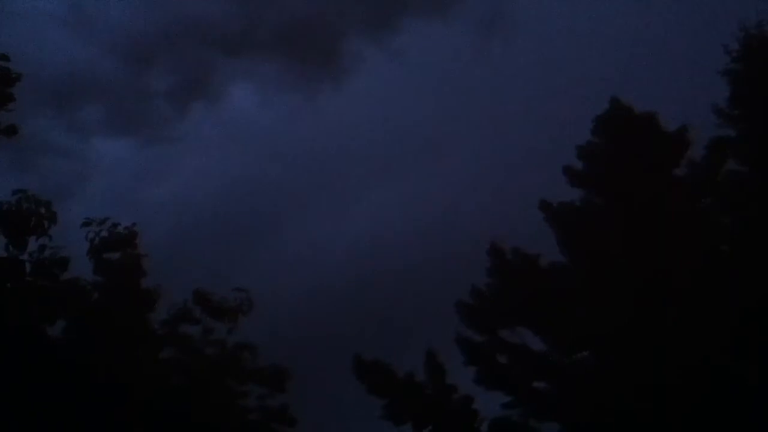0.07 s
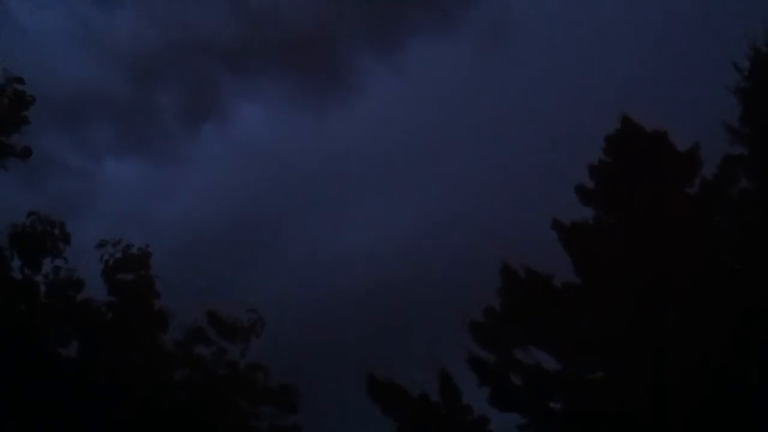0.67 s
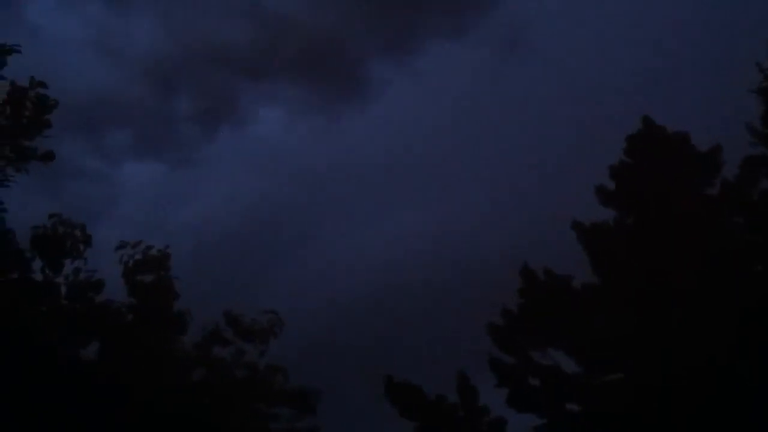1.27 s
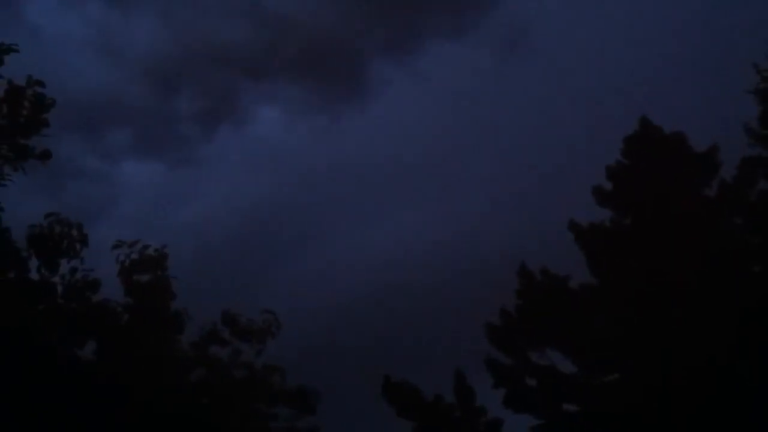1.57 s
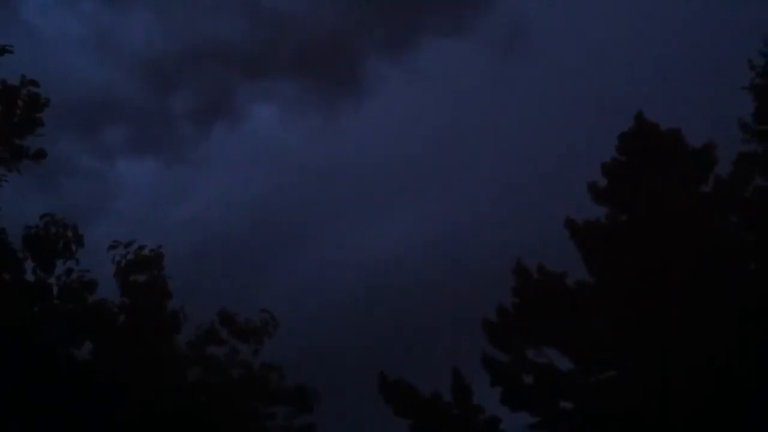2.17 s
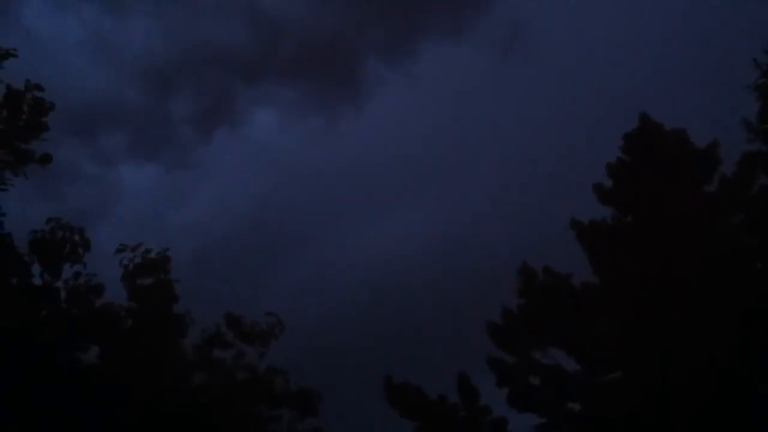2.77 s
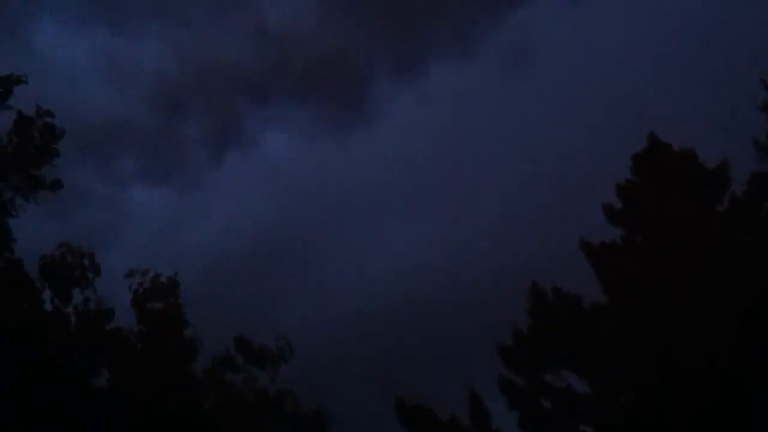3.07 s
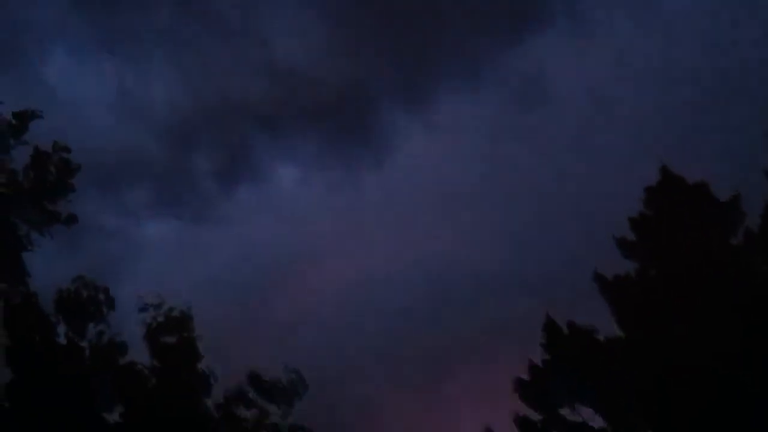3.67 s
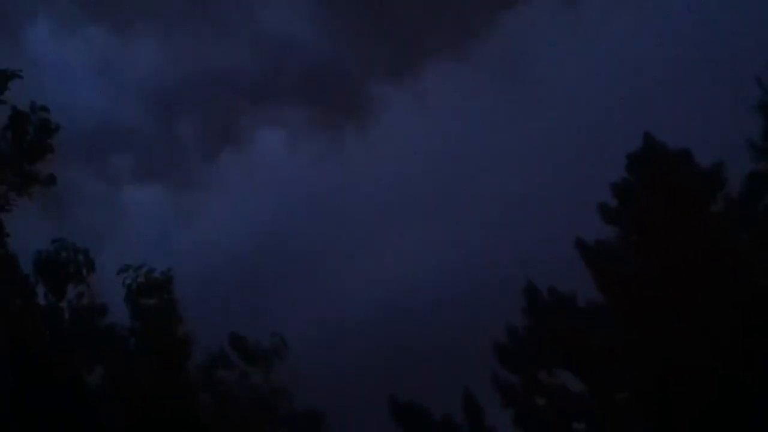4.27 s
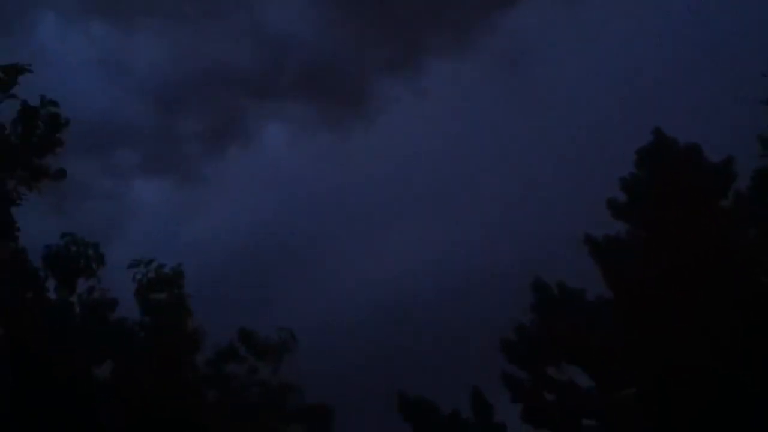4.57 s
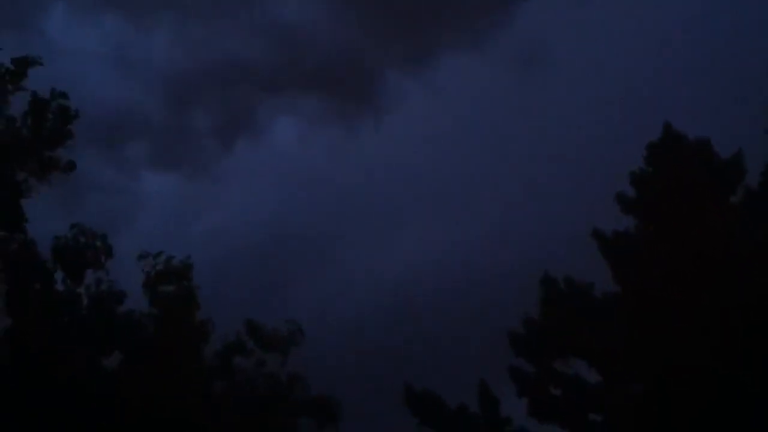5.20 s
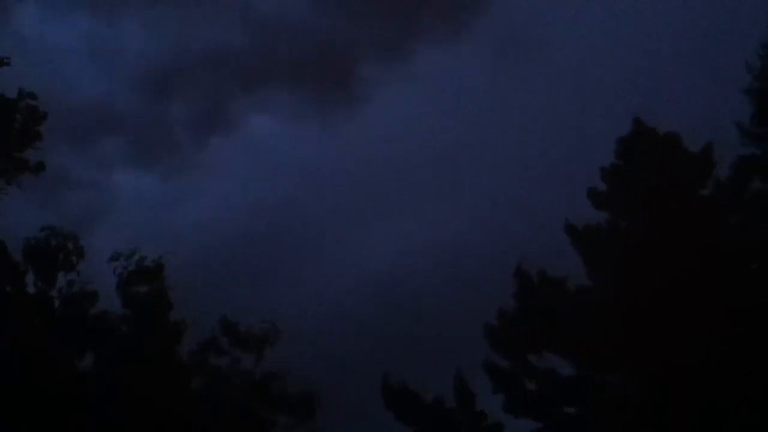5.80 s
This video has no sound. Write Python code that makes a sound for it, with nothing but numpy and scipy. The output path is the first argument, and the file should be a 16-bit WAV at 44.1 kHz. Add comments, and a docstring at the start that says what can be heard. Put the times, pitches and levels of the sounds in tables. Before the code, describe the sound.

Far thunder rolls over a garden, already rumbling at the start. It swells in a chain of low, rounded peals, is loudest about two seconds in, then mutters away with one smaller late swell. A soft breeze rises in the trees as it fades, and a distant motor hums very faintly. The small handheld microphone adds steady hiss and a few tiny clicks, and something gives one light tap.

```python
"""Far thunder rolls over a garden at dusk: a chain of peals swells three times, then mutters away.
Shocks from the kinks of the lightning channel arrive rounded by air and coloured by nearby walls.
Wind rises softly in the trees, a distant motor hums, and something gives one light tap.
A small camera adds microphone hiss and faint ticks, knocks and finger brushes in the hand."""
import sys
import numpy as np
from scipy import signal
from scipy.fft import rfft, irfft, next_fast_len
from scipy.io import wavfile
from scipy.ndimage import uniform_filter1d

SR = 44100
rng = np.random.default_rng(int(sys.argv[2]) if len(sys.argv) > 2 else 0)


def wrap_up_sound(samples):
    """Save the sound to the file named by the first command line argument, as 16-bit audio."""
    columns = np.atleast_2d(samples).T
    # keep every value between -1 and 1, then stretch to whole-number steps
    tamed = np.clip(columns, -1, 1)
    steps = np.round(tamed * 32767).astype(np.int16)
    wavfile.write(sys.argv[1], SR, steps)


N = 266364
TIME_S = np.arange(N) / SR
CUTOFF_HZ = 15700
ECHO_DB, ECHO_T60_S = -2.5, 0.74  # off land and clouds
FLUTTER_DB, FLUTTER_HZ = 1.1, 9.2  # uneven roll of the rumble
RUMBLE_BODY_DB, PEAL_GRAVEL_DB = -3.5, -7.5  # rumble's body re its roll; peals' gravel re their body

# Spectra of microphone hiss, far foliage and near leaves: freq_hz, relative_db
HISS_SPECTRUM = [(20, -5), (200, 2), (1000, 4), (2500, 1.5), (4000, 0.64), (5000, -2), (6300, -4),
                 (8000, -7), (10000, -12), (12500, -15), (14500, -17), (16000, -22)]
WASH_SPECTRUM = [(45, -32), (70, -9.5), (110, -5.5), (200, 5.5), (400, 1), (620, 2.5), (760, 8.5),
                 (900, 2.5), (1200, 0.5), (1500, -5), (1900, -8.5), (2500, -19), (4000, -34), (8000, -40)]
LEAF_SPECTRUM = [(800, -23), (1300, 4.5), (1600, 3), (2050, 3), (2500, -7), (4000, -20), (8000, -46)]
# Far foliage and near leaves as one gust arrives: time_s, level_db
WASH_CURVE = [(0, -69), (1.4, -71), (2.8, -73), (3.25, -69.5), (6.04, -69.5)]
LEAF_CURVE = [(0, -99), (2.8, -86.5), (3.9, -78.5), (4.5, -86), (4.66, -76.5), (4.9, -79), (5.25, -78),
              (5.58, -74.5), (5.8, -75.5), (6.04, -78)]
# Motor tones: pitch_hz, level_db
MOTOR_PARTIALS = [(582, -87), (757, -79.5), (873, -88.5), (932, -85.5), (1107, -89.5), (1217, -91)]
# Fingers on the camera case: centre_s, level_db, centre_hz, half_length_s
FINGER_BRUSHES = [(2.612, -81, 8500, .012), (2.646, -76, 7000, .015)]
# Camera knocks: start_s, level_db, pitch_hz, t60_s
CASE_KNOCKS = [(2.6059, -60, 12500, .0025), (3.6964, -53.5, 925, .012), (3.7015, -58, 760, .012)]
# Tap and its one bounce: start_s, strength_db
TAP_HITS = [(2.052, -0.5), (2.0568, -10)]
# Modes of the tapped object: pitch_hz, level_db, t60_s
TAP_RINGS = [(1130, -55, 0.018), (1460, -66, 0.065), (1860, -60.5, 0.055), (2044, -60, 0.05),
             (2360, -69, 0.03)]

# Resonances between walls: centre_hz, width_hz, lift_db
WALL_MODES = [(139, 8.8, 4), (171.5, 11, 5), (226.7, 13, 5), (291.5, 13, 3.5), (341.7, 16, 4.5),
              (386, 18, 2.8)]
# Thunder bands, low to high: freq_hz, relative_db
DEEP_SPECTRUM = [(20, -25), (42, -39), (58, -15), (78, -15.5), (98, 2), (112, 6), (135, -12), (200, -38)]
ROLL_SPECTRUM = [(50, -61), (85, -46), (108, -28.5), (135, -2), (170, 3), (235, 0), (280, -20),
                 (400, -33.5)]
BODY_SPECTRUM = [(170, -46), (230, -19.5), (265, 6), (375, 3), (425, -11), (490, -20), (650, -41)]
GRAVEL_SPECTRUM = [(300, -39.5), (390, -8.5), (440, 1.5), (530, 0), (640, -4.5), (790, -11), (950, -20),
                   (1300, -46), (2200, -56)]
# Deep bass, bending round the land in smooth swells: time_s, level_db
DEEP_CURVE = [(0, -80), (0.12, -62), (0.5, -78), (0.95, -64), (1.35, -73.5), (1.75, -63), (2.1, -62),
              (2.35, -63.5), (2.48, -72), (2.66, -69), (2.84, -65), (3.05, -80), (3.5, -75.5), (4.65, -78),
              (4.9, -67.5), (5.25, -84.5), (6.04, -78)]
# Unbroken rumble of countless small arrivals: time_s, level_db
RUMBLE_CURVE = [(0, -50), (1.05, -55), (1.38, -59.5), (1.8, -53), (2.3, -53.5), (3.05, -58.5), (3.75, -63),
                (5.0, -62.5), (5.25, -63.5), (6.04, -64.5)]
# Air absorption, greater on the longer, later paths: time_s, gravel_gain_db
AIR_CURVE = [(0, 0.5), (1.95, -2), (2.5, -6), (6.04, -4)]
# Thumps standing out of the roll: centre_s, level_db, centre_hz, half_length_s
THUMPS = [(0.071, -49.5, 188, 0.011), (0.11, -45.5, 183, 0.01), (0.103, -60, 510, 0.01),
          (0.213, -46.5, 180, 0.012), (0.5, -46, 209, 0.014), (0.53, -51, 200, 0.0105),
          (0.63, -57, 181, 0.0075), (0.847, -47, 215, 0.012), (0.912, -50, 370, 0.019),
          (0.926, -48, 196, 0.0069), (1.007, -43, 180, 0.0054), (1.043, -52, 197, 0.0055),
          (1.082, -41.5, 185, 0.015), (1.697, -44, 187, 0.017), (1.701, -78, 66, .035),
          (1.723, -46, 203, 0.0066), (1.748, -40, 270, 0.0059), (1.749, -55, 570, 0.0073),
          (1.85, -36.5, 205, 0.0081), (1.857, -54.5, 536, 0.01), (1.876, -40, 192, 0.0084),
          (1.879, -54, 120, 0.021), (1.914, -53, 346, 0.0082), (1.955, -48, 360, .009),
          (1.982, -40, 230, 0.0068), (1.99, -54.5, 530, 0.0098), (2.008, -51, 118, .025),
          (2.011, -40, 222, 0.01), (2.07, -38.5, 188, 0.0052), (2.111, -40, 215, 0.0079),
          (2.118, -40, 173, 0.0094), (2.154, -41, 213, 0.0098), (2.245, -49, 185, 0.014),
          (2.531, -46, 315, 0.0081), (2.564, -50.5, 320, 0.017), (2.677, -75, 62, .03),
          (2.684, -47, 140, 0.018), (2.699, -42, 220, 0.022), (2.708, -48.5, 332, 0.013),
          (2.743, -48.5, 266, 0.016), (2.963, -57, 280, 0.0078), (4.816, -74.5, 66, .035),
          (4.825, -71, 104, 0.035), (4.847, -58.5, 324, .03), (5.76, -57.5, 227, 0.042)]
# Peals, one per lightning branch: crest_s, level_db, half_length_s, brightness_db
BRANCH_PEALS = [(0.115, -43, 0.1, -8), (0.24, -59, 0.029, 1), (0.525, -48.5, 0.06, -11),
                (0.644, -54.5, 0.14, 1.5), (0.842, -46, 0.06, -1.5), (0.912, -52, 0.028, 3),
                (1.051, -45.5, 0.047, -3), (1.27, -58, 0.057, -1), (1.474, -51.5, 0.046, -4),
                (1.55, -57, 0.022, 10.5), (1.678, -40.5, 0.053, -2), (1.75, -50.5, 0.078, 6.5),
                (1.801, -42.5, 0.025, -0.5), (1.866, -41, 0.028, -5.5), (1.95, -43, 0.045, -4),
                (2.087, -48, 0.13, -1), (2.345, -60.5, 0.15, 8), (2.693, -50, 0.11, -1),
                (2.823, -49.5, 0.08, -1), (3.137, -60.5, 0.012, 0), (3.488, -58, 0.041, -16),
                (4.037, -57.5, 0.056, -2.5), (4.719, -52.5, 0.022, -28), (4.835, -53, 0.081, -5),
                (4.95, -54, 0.04, -5), (5.862, -62, 0.064, -3)]


def from_db(db):
    """Decibels to gain."""
    return 10 ** (np.asarray(db) / 20)


def unit_rms(x):
    """Scale to rms 1."""
    return x / np.sqrt(np.mean(x ** 2) + 1e-20)


def per_sample(curve):
    """Interpolate a (time_s, value) curve."""
    return np.interp(TIME_S, *np.transpose(curve))


def coloured(x, spectrum):
    """Filter by a spectrum interpolated in log frequency; rms 1."""
    hz, db = np.transpose(spectrum)
    size = next_fast_len(N)
    bins_hz = np.maximum(np.fft.rfftfreq(size, 1 / SR), 1)
    gain = from_db(np.interp(np.log(bins_hz), np.log(hz), db, right=-120))
    return unit_rms(irfft(rfft(x, size) * gain, size)[:N])


def noise(spectrum):
    """Coloured Gaussian noise; rms 1."""
    return coloured(rng.standard_normal(N), spectrum)


def impulses(rate_hz, spread_db):
    """Random arrivals of either sign and uneven size."""
    arrives = rng.random(N) < rate_hz / SR
    return arrives * rng.choice([-1, 1], N) * from_db(spread_db * rng.standard_normal(N))


def levelled(x, span_s):
    """Flatten swells slower than the span; keep the grain."""
    size = int(span_s * SR)
    power = uniform_filter1d(uniform_filter1d(x ** 2, size), size)
    return x / np.sqrt(np.maximum(power, 1e-12))


def bandpass(x, hz, edge_ratio):
    """Gentle zero-phase band-pass."""
    sos = signal.butter(2, [hz / edge_ratio, hz * edge_ratio], "band", fs=SR, output="sos")
    return signal.sosfiltfilt(sos, x + 1e-18)


def bursts(source, table, edge_ratio):
    """Per row, one band of the source, evened and Gaussian-windowed."""
    out = np.zeros(N)
    for centre_s, db, hz, half_s in table:
        near = np.abs(TIME_S - centre_s) < 0.2
        ripples = signal.hilbert(unit_rms(bandpass(source[near], hz, edge_ratio)))
        even = np.sqrt(2) * ripples.real / np.hypot(np.abs(ripples), 0.3)
        window = np.exp(-((TIME_S[near] - centre_s) / half_s) ** 2)
        out[near] += from_db(db) * bandpass(window * even, hz, edge_ratio ** 2)
    return out


def hiss(level_db):
    """Steady microphone noise."""
    return from_db(level_db) * noise(HISS_SPECTRUM)


def motor(wander_hz, waver_db):
    """Far steady tones; moving air wavers their pitch and level."""
    drift_spectrum = [(1, 0), (6, -20)]
    out = np.zeros(N)
    for hz, db in MOTOR_PARTIALS:
        wander, waver = noise(drift_spectrum), noise(drift_spectrum)
        phase = 2 * np.pi * np.cumsum(hz + wander_hz * wander) / SR
        out += from_db(db + waver_db * waver) * np.sqrt(2) * np.sin(phase)
    return out


def breeze(wash_gain_db):
    """Far foliage blurs to a wash; near leaves add soft touches in the gust."""
    wash = from_db(per_sample(WASH_CURVE) + wash_gain_db) * noise(WASH_SPECTRUM)
    touches = coloured(impulses(rate_hz=1500, spread_db=5.0), LEAF_SPECTRUM)
    return wash + from_db(per_sample(LEAF_CURVE)) * touches


def camera_knocks():
    """The case clicks in the hand: instant onset, heavily damped ring."""
    out = np.zeros(N)
    for start_s, db, hz, t60_s in CASE_KNOCKS:
        age_s = np.maximum(TIME_S - start_s, 0)
        out += from_db(db - 60 * np.minimum(age_s / t60_s, 2)) * np.sin(2 * np.pi * hz * age_s)
    return out


def finger_brushes():
    """Fingers rub the case: brief high noise."""
    return bursts(rng.standard_normal(N), FINGER_BRUSHES, edge_ratio=1.35)


def tap():
    """Each contact rings the same short modes."""
    out = np.zeros(N)
    for start_s, strength_db in TAP_HITS:
        age_s = np.clip(TIME_S - start_s, 0, 1)
        for hz, db, t60_s in TAP_RINGS:
            out += from_db(strength_db + db - 60 * age_s / t60_s) * np.sin(2 * np.pi * hz * age_s)
    return out


def walls(x):
    """Sound trapped between walls rings at a few low pitches."""
    ringing = np.zeros(N)
    for hz, width_hz, lift_db in WALL_MODES:
        b, a = signal.iirpeak(hz, hz / width_hz, fs=SR)
        ringing += (from_db(lift_db) - 1) * signal.lfilter(b, a, x + 1e-18)
    return x + ringing


def peal_power(crest_s, half_s):
    """Power envelope of one peal: rounded crest, then dying echo."""
    age_s = TIME_S - crest_s
    crest = np.exp(-2 * (age_s / half_s) ** 2)
    echo = from_db(ECHO_DB - 60 * np.maximum(age_s, 0) / ECHO_T60_S) ** 2
    return crest + echo * (1 - crest) * (age_s > 0)


def thunder_gains():
    """Rumble and peals add in power; returns roll, body and gravel gains."""
    flutter = noise([(2, -20), (FLUTTER_HZ, 0), (2 * FLUTTER_HZ, -20)])
    rumble_db = per_sample(RUMBLE_CURVE) + FLUTTER_DB * flutter
    rumble_body = from_db(rumble_db + RUMBLE_BODY_DB) ** 2
    peal_roll, peal_body = np.zeros((2, N))
    for crest_s, db, half_s, brightness_db in BRANCH_PEALS:
        power = from_db(db) ** 2 * peal_power(crest_s, half_s)
        peal_roll += power
        peal_body += power * from_db(brightness_db) ** 2
    roll = np.sqrt(from_db(rumble_db) ** 2 + peal_roll)
    body = np.sqrt(rumble_body + peal_body)
    gravel = np.sqrt(rumble_body + peal_body * from_db(PEAL_GRAVEL_DB) ** 2)
    return roll, body, gravel * from_db(per_sample(AIR_CURVE))


def thunder():
    """One shock stream, rounded by air: deep bass, three bands swelling with the peals, and thumps."""
    roll_gain, body_gain, gravel_gain = thunder_gains()
    shocks = walls(impulses(rate_hz=2500, spread_db=1.5))
    deep = from_db(per_sample(DEEP_CURVE)) * levelled(coloured(shocks, DEEP_SPECTRUM), span_s=0.091)
    roll = roll_gain * from_db(-0.3) * levelled(coloured(shocks, ROLL_SPECTRUM), span_s=0.041)
    body = body_gain * from_db(-0.24) * levelled(coloured(shocks, BODY_SPECTRUM), span_s=0.031)
    gravel = gravel_gain * levelled(coloured(shocks, GRAVEL_SPECTRUM), span_s=0.052)
    return deep + roll + body + gravel + bursts(shocks, THUMPS, edge_ratio=1.236)


def scene():
    """Garden, camera and thunder in mono."""
    garden = breeze(wash_gain_db=2.5) + motor(wander_hz=0.78, waver_db=3.0) + tap()
    camera = camera_knocks() + finger_brushes() + hiss(level_db=-70.5)
    return (garden + camera + thunder())[None, :]


def record(dry):
    """Steep low-pass."""
    return signal.sosfilt(signal.ellip(12, 0.1, 80, CUTOFF_HZ, fs=SR, output="sos"), dry)


dry = scene()
out = record(dry)
wrap_up_sound(out)
```